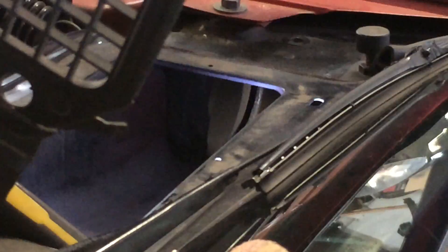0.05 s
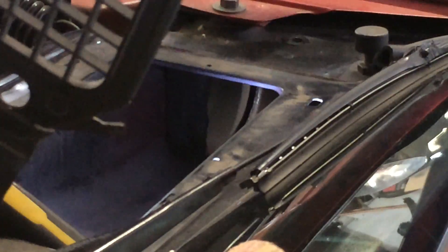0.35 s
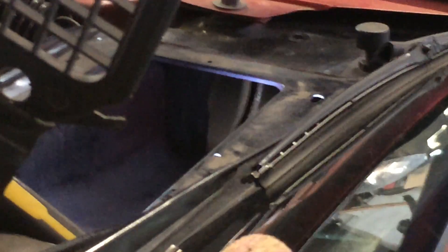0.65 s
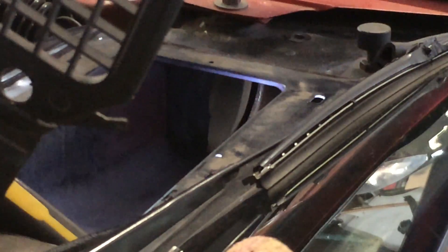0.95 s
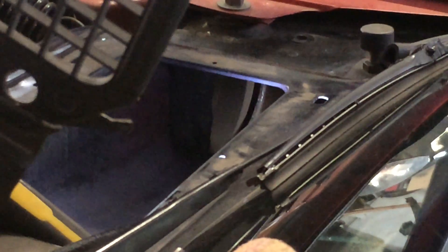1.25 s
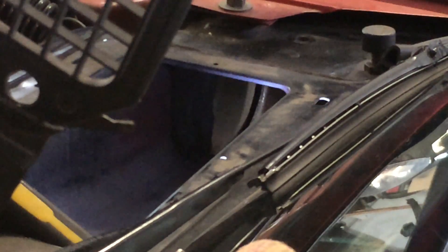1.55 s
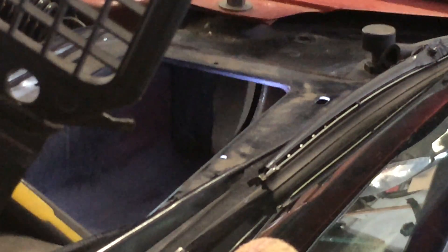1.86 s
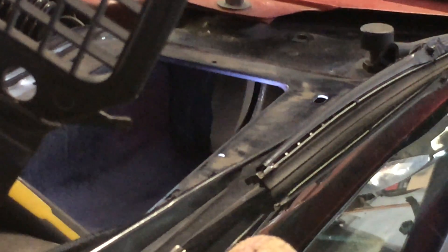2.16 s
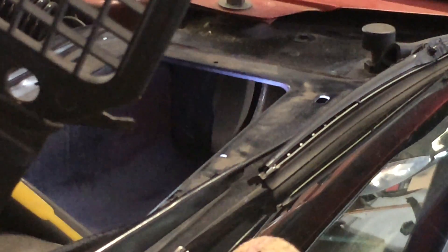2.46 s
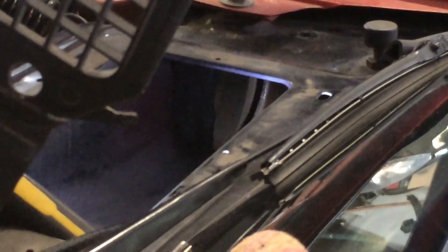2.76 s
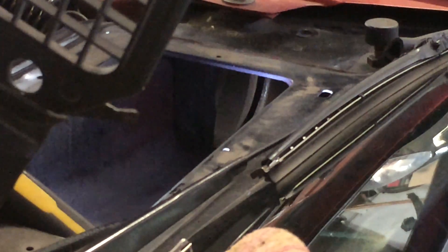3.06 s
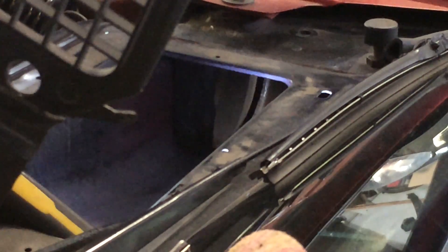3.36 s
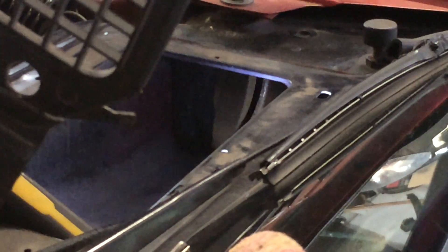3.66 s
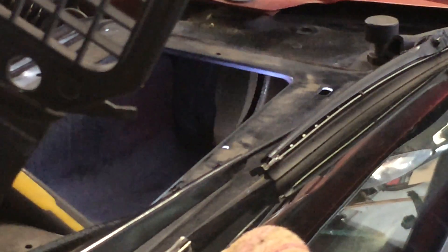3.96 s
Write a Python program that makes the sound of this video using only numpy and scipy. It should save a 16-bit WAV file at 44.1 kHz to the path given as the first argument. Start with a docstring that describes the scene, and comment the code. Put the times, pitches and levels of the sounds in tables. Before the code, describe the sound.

A small blower fan motor hums and whines steadily over a rush of air inside a car. After about a second the power cuts, and it winds down with a ticking rub that slows and fades.

```python
"""Car blower winding down.

A small motor in the footwell hums and whines over a rush of air, its brushes hissing faintly.
Power is cut: the whine dies and each low shaft order swells as it slides through the housing's boom.
Coasting, the rotor rubs once a turn: a ticking pulse that slows and fades, with a few soft bumps."""
import sys
import numpy as np
from scipy import signal
from scipy.fft import rfft, irfft
from scipy.io import wavfile
from scipy.ndimage import uniform_filter1d

SR = 44100
rng = np.random.default_rng(int(sys.argv[2]) if len(sys.argv) > 2 else 0)


def to_wav(sig):
    """Store sig (one row per channel, or 1-D mono) as 16-bit WAV at the path in sys.argv[1].

    Samples outside -1..1 are clipped; the rate is SR.
    """
    pcm = np.clip(np.atleast_2d(sig), -1, 1) * 32767
    pcm = np.round(pcm).astype(np.int16)
    wavfile.write(sys.argv[1], SR, pcm.T)  # frames by channels


N = 176400

# Shaft speed: time_s, speed_hz
SHAFT_SPEED = [(0, 36.26), (.45, 36.51), (.6, 36.41), (1, 36.49), (1.08, 36.7), (1.2, 33.5), (1.33, 28.2),
               (1.45, 26), (1.65, 23.1), (1.85, 20.9), (2.05, 19.65), (2.3, 18.46), (2.6, 17.43),
               (3, 16.82), (3.3, 16.64), (3.68, 16.54), (3.75, 13.3), (3.82, 13.14), (4, 7.31)]
# Hum partials: shaft_order, weight_db
HUM_ORDERS = [(3, 13.5), (4, 5.5), (5, 2), (6, 5.5), (7, -7.5), (8, -3), (9, -7), (11, -2), (13, -10)]
# Hum envelope: time_s, level_db
HUM_ENVELOPE = [(0, -37), (.08, -37), (.45, -36.5), (.68, -45.5), (.82, -33), (1, -40.5), (1.15, -33.5),
                (1.28, -42), (1.36, -47), (1.6, -51.5), (1.92, -46.5), (2.04, -52), (2.17, -46),
                (2.42, -46), (2.53, -40.5), (2.8, -47), (2.93, -51.5), (3.03, -64), (3.3, -57.5),
                (3.52, -50), (3.63, -62), (3.75, -46.5), (3.85, -56), (4, -57)]
# Whine under power: shaft_order, level_db
WHINE_ORDERS = [(6, -51), (7, -63.5), (9, -57), (11, -58), (12, -59), (13, -52), (14, -41), (15, -49.5),
                (16, -50), (17, -56), (19, -82), (20, -65), (29, -61.5), (40, -66.5), (44, -69), (102, -72),
                (103, -66), (132, -73.5), (136, -74), (137, -74.5)]
# Rub strength: time_s, gain_db
RUB_ENVELOPE = [(1.05, -57), (1.17, -46.5), (1.4, -46.5), (1.52, -52), (1.88, -52), (2.05, -52),
                (2.33, -53.5), (2.65, -52), (3.1, -52.5), (3.58, -51.5), (3.72, -56), (3.8, -55.5),
                (3.88, -61), (4, -66)]
# Orders the uneven rotor favours or lacks: shaft_order, gain_db
ROTOR_ACCENTS = [(15, 0), (16, 1.5), (17, 0), (18, -1.5), (19, 3.5), (20, -4), (21, -3), (22, -2),
                 (23, -22.5), (24, 1), (25, -9.5), (26, 4.5), (27, 7), (28, 1)]
# Housing response to the rub: freq_hz, gain_db
HOUSING_RESPONSE = [(100, -38), (150, -15.5), (200, -26), (265, -16.5), (340, -35), (400, -14.5),
                    (440, -10.5), (462, -31), (482, -0.5), (502, 1.5), (530, -2), (560, -37), (590, -10),
                    (618, -5), (645, -37), (730, -51), (800, -16.5), (860, -32), (1200, -36.5)]
# Rub grit spectrum: freq_hz, relative_db
GRIT_SPECTRUM = [(100, -8), (250, -24.5), (550, 22), (800, -2), (1150, -5), (1500, -19), (2500, -19),
                 (8000, -54)]
# Airflow spectrum: freq_hz, relative_db
AIR_SPECTRUM = [(15, -2), (40, 1), (80, 1.5), (120, 10), (165, 6), (205, 2.5), (238, -8.5), (275, -1),
                (350, -5.5), (430, -1), (600, -6.5), (700, -6), (880, -8.5), (1050, -6), (1220, -9),
                (1350, -16.5), (1480, -16), (1950, -20), (2600, -21.5), (3500, -22.5), (4300, -27.5),
                (5000, -28), (5600, -31), (7000, -33), (9000, -38), (12000, -38.5), (15500, -44.5)]
# Motor can resonances: centre_hz, width_hz, gain_db
CAN_MODES = [(1634, 26, -72.5), (3560, 200, -72.5), (3723, 39, -73.5), (4200, 410, -73.5), (4750, 20, -84),
             (4953, 14, -78.5), (6940, 41, -85)]
# Brush noise envelope: time_s, gain_db
BRUSH_ENVELOPE = [(0, 0.5), (1.2, 3.5), (1.45, -2.5), (1.75, -2.5), (2.1, -13.5), (2.9, -9.5), (3.6, -11),
                  (4, -24)]
# Soft bumps: peak_s, half_length_s, centre_hz, width_hz, level_db
BUMP_EVENTS = [(3.187, .016, 100, 70, -50), (3.175, .015, 1100, 300, -63), (3.64, .022, 920, 160, -59),
               (3.72, .06, 110, 90, -54)]
# Background spectrum: freq_hz, relative_db
BACKGROUND_SPECTRUM = [(15, -8), (50, -4.5), (120, 8), (200, -2), (350, 0.5), (700, -9), (1500, -19),
                       (2500, -28.5), (4000, -25), (6000, -29.5), (9000, -32), (15500, -34.5)]

TIME_S = np.arange(N) / SR
FULL_SPEED_HZ, POWER_OFF_S = 36.4, 1.09


def amp(db):
    """Decibels to gain."""
    return 10 ** (np.asarray(db) / 20)


def unit(x):
    """Scale to rms 1."""
    return x / np.sqrt(np.mean(x ** 2) + 1e-20)


def curve(points):
    """Time breakpoints to one value per sample."""
    return np.interp(TIME_S, *np.transpose(points))


def response(points, hz):
    """Linear gain of a dB spectrum at hz."""
    freq_hz, gain_db = np.transpose(points)
    return amp(np.interp(np.log(hz + 1), np.log(freq_hz), gain_db))


def resonance(hz, centre_hz, width_hz):
    """Complex gain of a double-pole resonance."""
    return 1 / (1 + 2j * (hz - centre_hz) / width_hz) ** 2


def noise(gain):
    """Noise shaped by gain(hz), rms 1."""
    white = rfft(rng.standard_normal(N))
    return unit(irfft(white * gain(np.fft.rfftfreq(N, 1 / SR)), N))


def band(centre_hz, width_hz):
    """Noise in one resonance, rms 1."""
    return noise(lambda hz: 1 / (1 + ((hz - centre_hz) / width_hz) ** 2))


def drift(rate_hz):
    """Slow random wander, rms 1."""
    return noise(lambda hz: np.exp(-(hz / rate_hz) ** 2) * (hz > 0))


def hum(speed_hz, turns, boom_hz=111.8, width_hz=16, waver_db=2.5):
    """The shaft order nearest the housing's boom carries the hum; turbulence shakes it at speed."""
    tones, power = np.zeros(N), np.zeros(N)
    for order, weight_db in HUM_ORDERS:
        k = round(order)
        gain = amp(weight_db) * abs(resonance(k * speed_hz, boom_hz, width_hz))
        tones += gain * np.cos(2 * np.pi * (k * turns + rng.random()))
        power += gain ** 2 / 2
    shake_db = waver_db * drift(rate_hz=11) * speed_hz / FULL_SPEED_HZ
    return tones / np.sqrt(power) * amp(curve(HUM_ENVELOPE) + shake_db)


def whine(turns, waver_db=.7, fade_db_per_s=92):
    """Rotor slot tone and neighbours, dying once power is cut."""
    tones = np.zeros(N)
    for order, level_db in WHINE_ORDERS:
        gain = amp(level_db + waver_db * drift(rate_hz=13.4))
        tones += gain * np.cos(2 * np.pi * (round(order) * turns + rng.random()))
    coast_s = np.maximum(TIME_S - POWER_OFF_S, 0)
    return np.sqrt(2) * tones * amp(-fade_db_per_s * coast_s)


def rub(speed_hz, turns, waver_db=.5):
    """The rotor rubs once a turn: a gritty touch, then a knock."""
    strength = amp(curve(RUB_ENVELOPE) + waver_db * drift(rate_hz=4))
    return strength * knock(speed_hz, turns) + unit(strength) * grit(turns)


def knock(speed_hz, turns, ring_hz=535, span_hz=139, lead_turns=.12, tight_rad=.3, loose_rad=.7):
    """Smeared pulse whose orders glide down through the housing's resonances."""
    scatter = rng.uniform(-np.sqrt(3), np.sqrt(3), 70)  # per order, unit variance
    accent_db = {round(order): db for order, db in ROTOR_ACCENTS}
    pulses = np.zeros(N)
    for k in range(1, len(scatter)):
        order_hz = k * speed_hz
        gain = amp(accent_db.get(k, 0)) * response(HOUSING_RESPONSE, order_hz)
        # ring band lands tight; the rest comes early and loose
        ring = np.exp(-((order_hz - ring_hz) / span_hz) ** 6)
        tight = np.cos(2 * np.pi * k * turns + tight_rad * scatter[k])
        early = np.cos(2 * np.pi * k * (turns + lead_turns) + loose_rad * scatter[k])
        pulses += gain * (ring * tight + (1 - ring) * early)
    return np.sqrt(2) * pulses


def grit(turns, gain_db=-51.5, lead_turns=.22, rise_turns=.067):
    """Noise burst at the rotor's first touch in each turn."""
    since_touch = (turns + lead_turns) % 1 / rise_turns
    contact = np.sqrt(since_touch * np.exp(1 - since_touch))
    return amp(gain_db) * contact * noise(lambda hz: response(GRIT_SPECTRUM, hz))


def air(speed_hz, full_speed_db=-39.5, db_per_octave=18, patch_db=1, lag_s=.065):
    """Turbulent rush in drifting patches; flow trails the shaft and falls steeply with speed."""
    steady = noise(lambda hz: response(AIR_SPECTRUM, hz))
    spectrogram = signal.stft(steady, nperseg=512)[2]
    patches = uniform_filter1d(rng.standard_normal(spectrogram.shape), size=6, axis=0)
    patches = unit(uniform_filter1d(patches, size=8, axis=1))
    rush = signal.istft(spectrogram * amp(patch_db * patches), nperseg=512)[1][:N]
    flow = np.interp(TIME_S - lag_s, TIME_S, speed_hz) / FULL_SPEED_HZ
    return unit(rush) * amp(full_speed_db + db_per_octave * np.log2(flow))


def drone(speed_hz, turns, centre_hz=182.3, width_hz=58.5, gain_db=-50, knee_hz=22.5, db_per_octave=41.5):
    """Middle orders cross a second, weaker resonance; they drop away below the knee speed."""
    tones = np.zeros(N)
    for k in range(4, 16):
        phasor = np.exp(2j * np.pi * (k * turns + rng.random()))
        tones += (phasor * resonance(k * speed_hz, centre_hz, width_hz)).real
    slow_db = db_per_octave * np.minimum(np.log2(speed_hz / knee_hz), 0)
    return np.sqrt(2) * tones * speed_hz / FULL_SPEED_HZ * amp(gain_db + slow_db)


def brushes(turns, depth=.6, lead_turns=.067):
    """Brushes on the commutator ring the motor can, swelling once a turn."""
    hiss = sum(amp(db) * band(hz, width_hz) for hz, width_hz, db in CAN_MODES)
    swell = 1 + depth * np.cos(2 * np.pi * (turns + lead_turns))
    return hiss * swell * amp(curve(BRUSH_ENVELOPE))


def bumps():
    """Dull bumps and scuffs: short swells of band noise."""
    out = np.zeros(N)
    for peak_s, half_length_s, centre_hz, width_hz, level_db in BUMP_EVENTS:
        envelope = np.exp(-((TIME_S - peak_s) / half_length_s) ** 2)
        out += amp(level_db) * envelope * band(centre_hz, width_hz)
    return out


def background(level_db=-57.5):
    """Quiet, steady, dull noise."""
    return amp(level_db) * noise(lambda hz: response(BACKGROUND_SPECTRUM, hz))


def scene():
    """One shaft drives all blower layers, over bumps and background. Mono."""
    speed_hz = curve(SHAFT_SPEED)
    turns = np.cumsum(speed_hz) / SR
    blower = hum(speed_hz, turns) + whine(turns) + rub(speed_hz, turns)
    blower += air(speed_hz) + drone(speed_hz, turns) + brushes(turns)
    return (blower + bumps() + background())[None]


def record(dry, fade_in_s=.003, cutoff_hz=15750):
    """Fade-in, then a steep low-pass."""
    faded = dry * np.minimum(TIME_S / fade_in_s, 1)
    lowpass = signal.firwin(511, cutoff_hz, window=("kaiser", 9), fs=SR)
    return signal.oaconvolve(faded, lowpass[None], "same")


dry = scene()
out = record(dry)
to_wav(out)
```